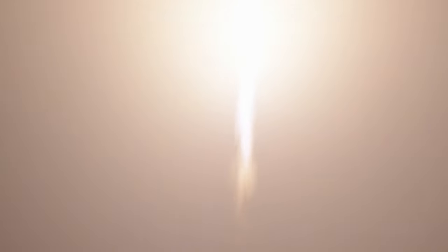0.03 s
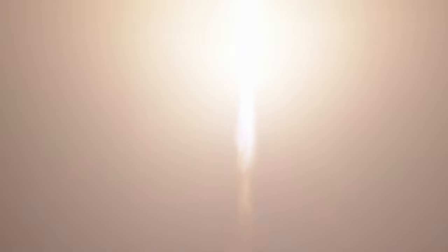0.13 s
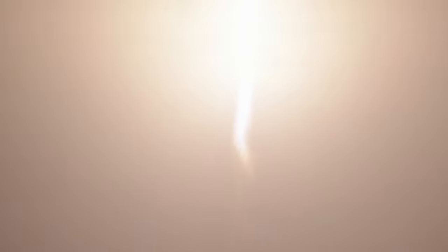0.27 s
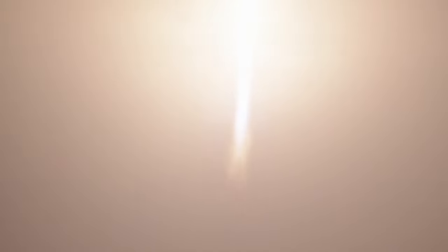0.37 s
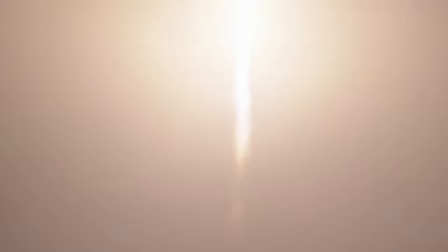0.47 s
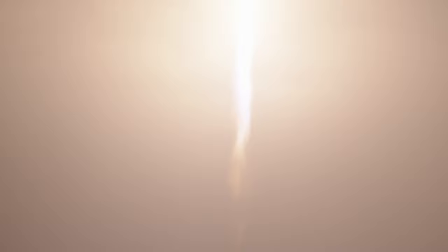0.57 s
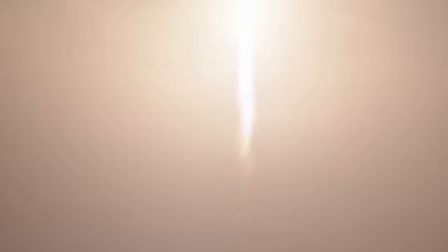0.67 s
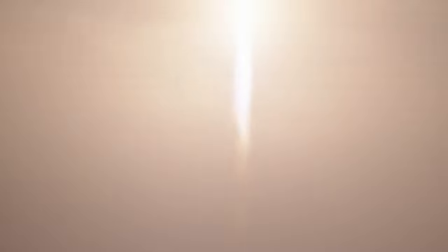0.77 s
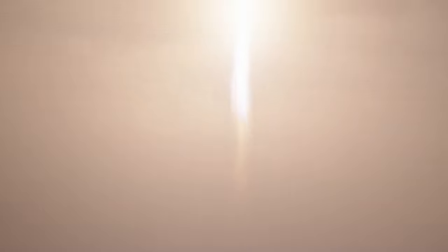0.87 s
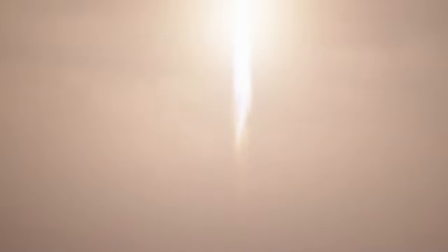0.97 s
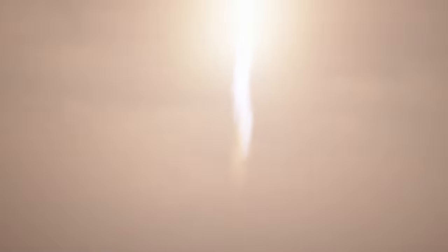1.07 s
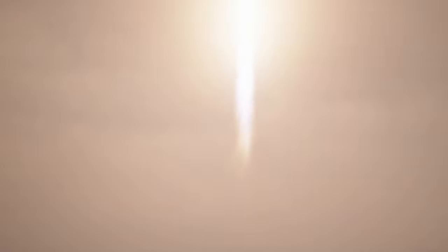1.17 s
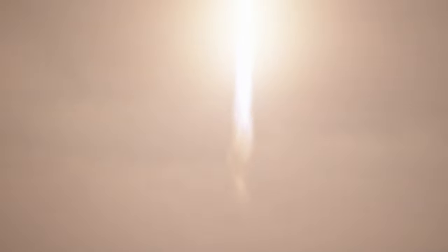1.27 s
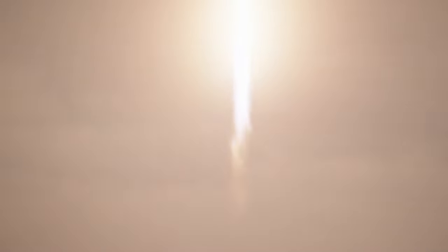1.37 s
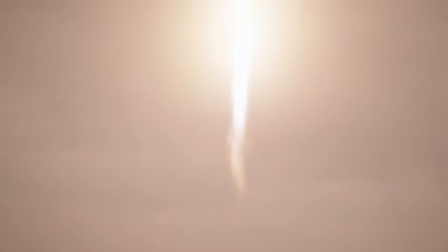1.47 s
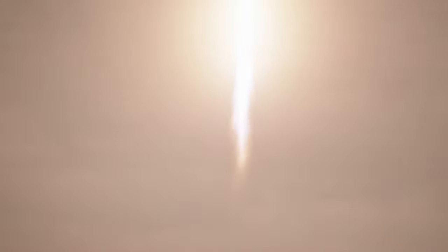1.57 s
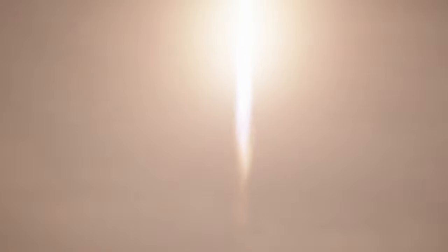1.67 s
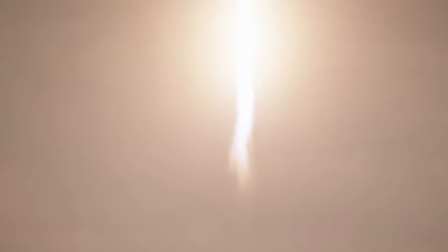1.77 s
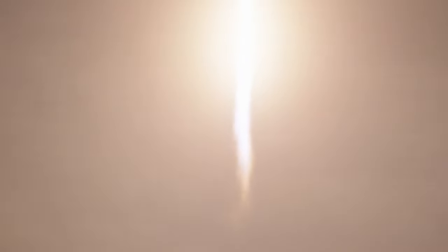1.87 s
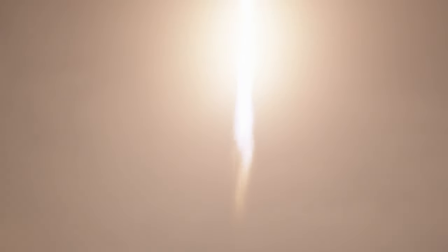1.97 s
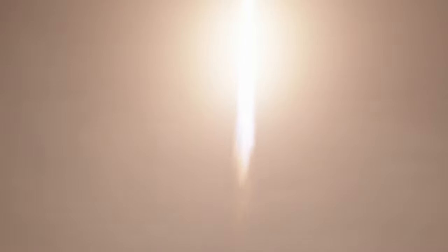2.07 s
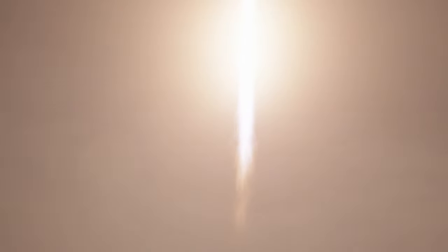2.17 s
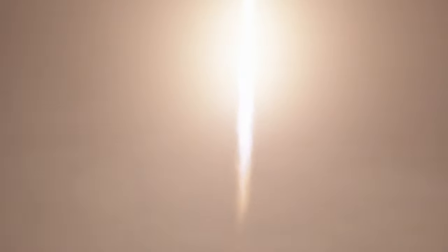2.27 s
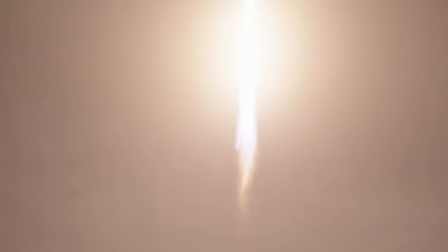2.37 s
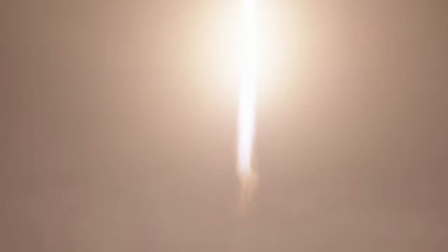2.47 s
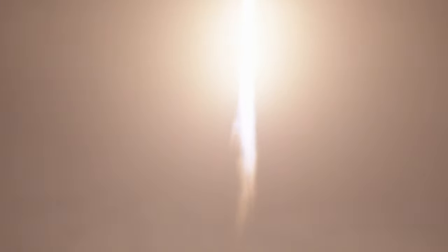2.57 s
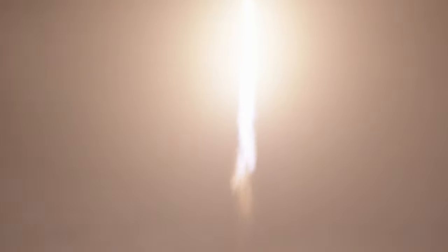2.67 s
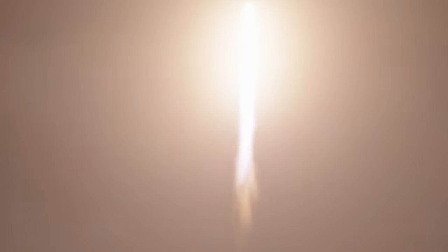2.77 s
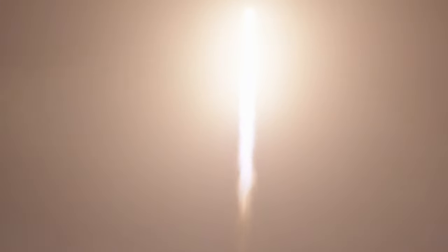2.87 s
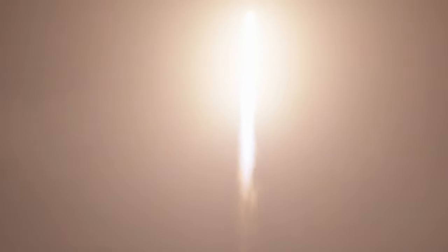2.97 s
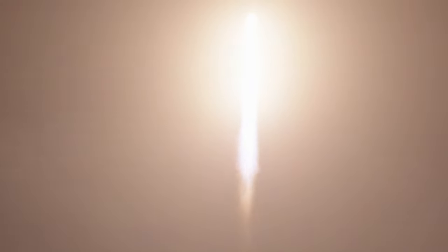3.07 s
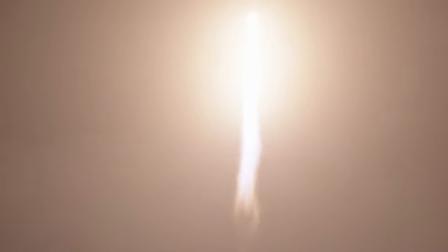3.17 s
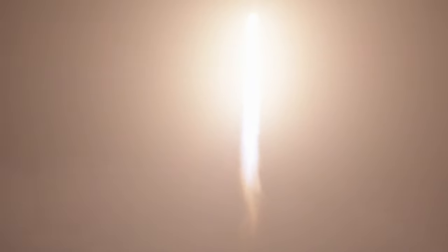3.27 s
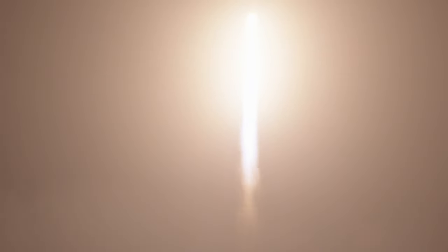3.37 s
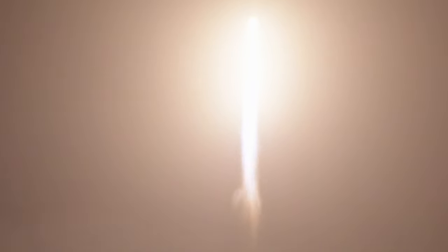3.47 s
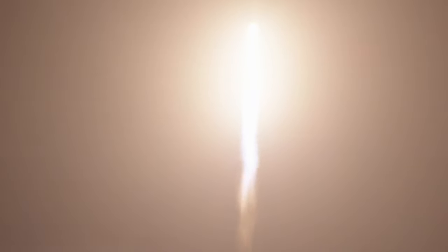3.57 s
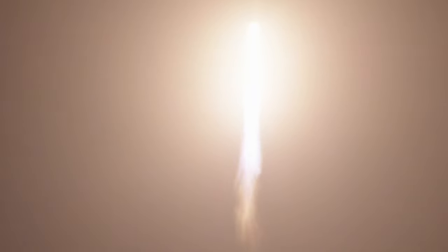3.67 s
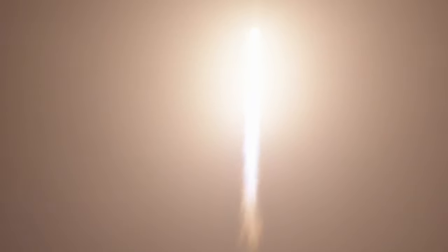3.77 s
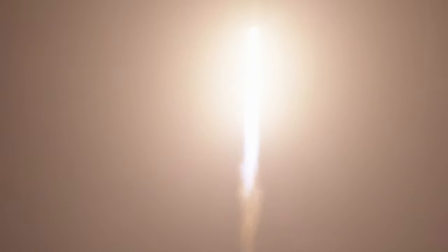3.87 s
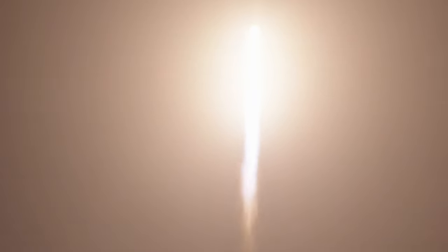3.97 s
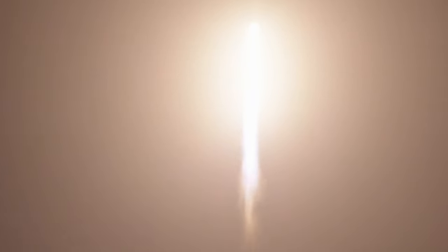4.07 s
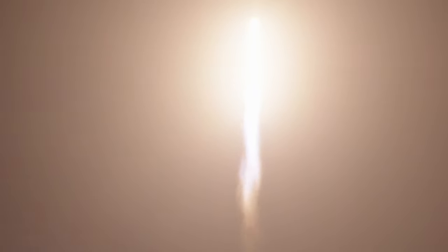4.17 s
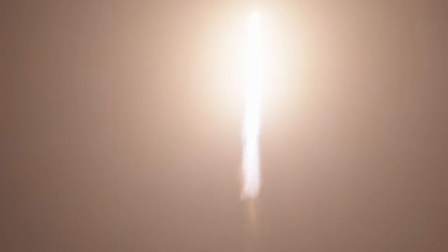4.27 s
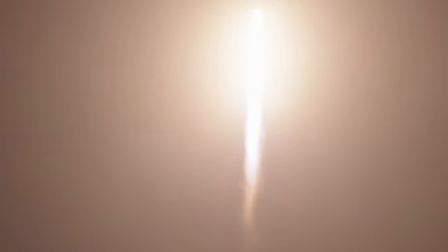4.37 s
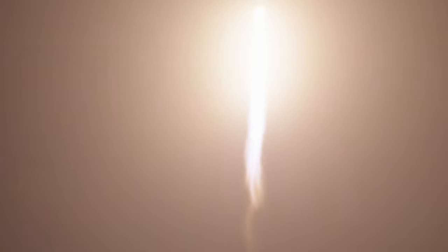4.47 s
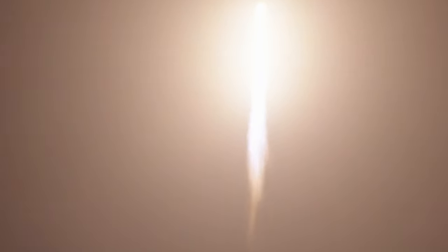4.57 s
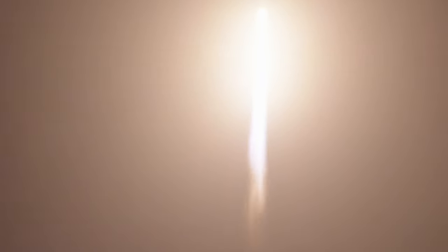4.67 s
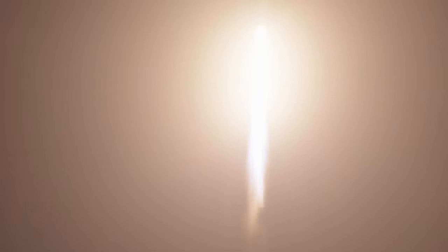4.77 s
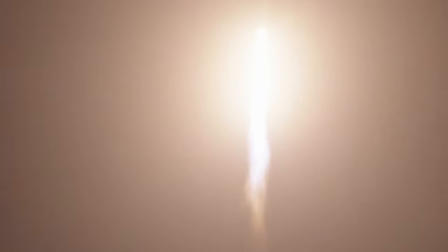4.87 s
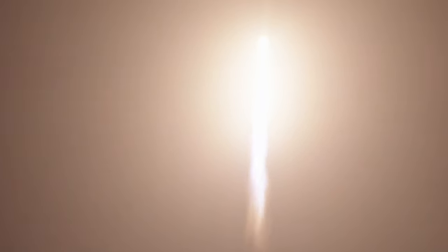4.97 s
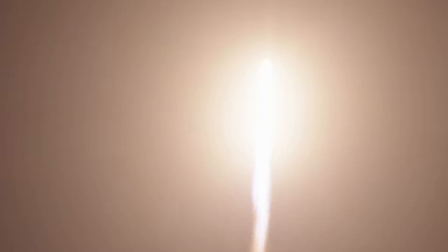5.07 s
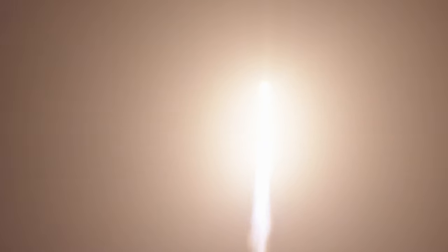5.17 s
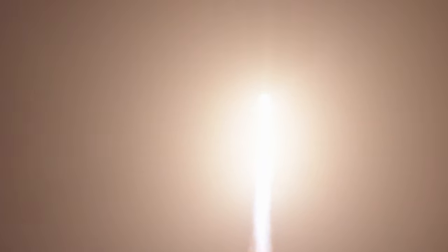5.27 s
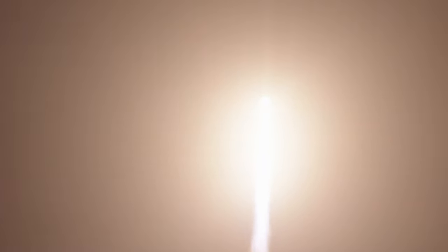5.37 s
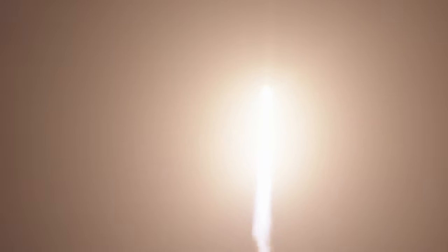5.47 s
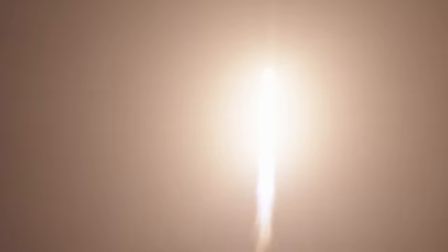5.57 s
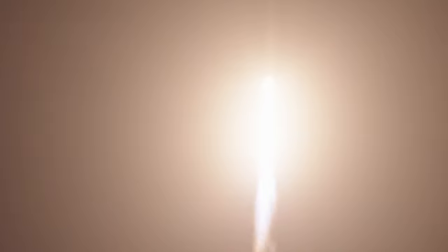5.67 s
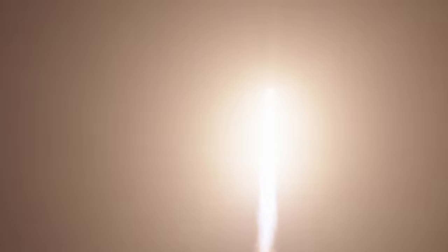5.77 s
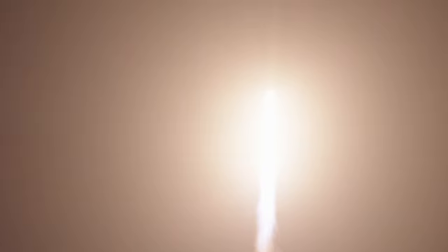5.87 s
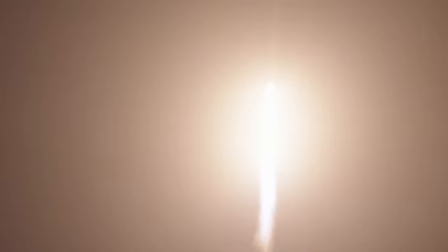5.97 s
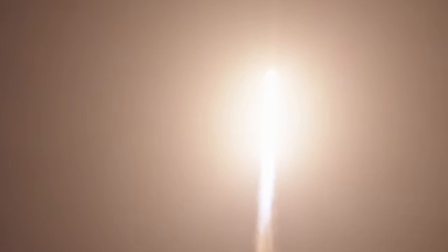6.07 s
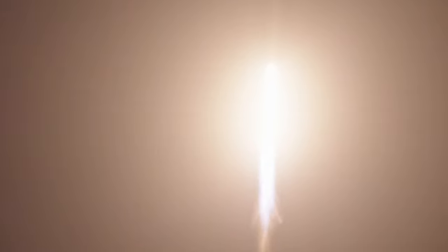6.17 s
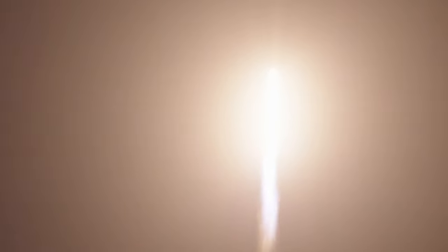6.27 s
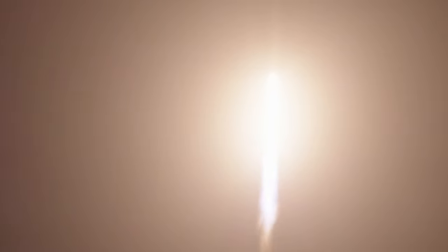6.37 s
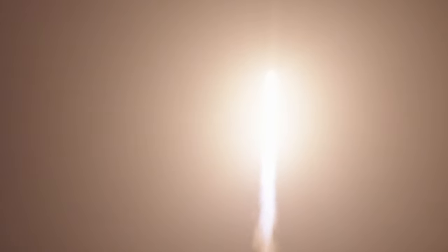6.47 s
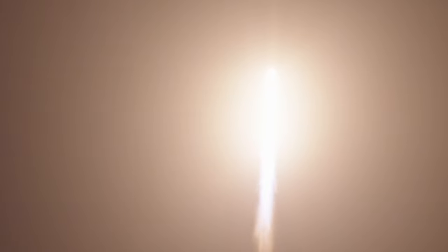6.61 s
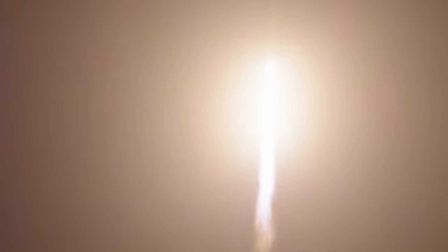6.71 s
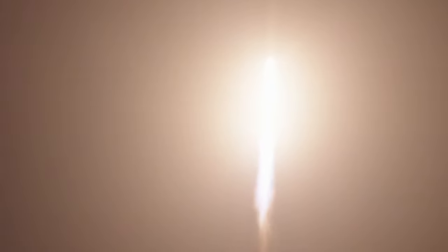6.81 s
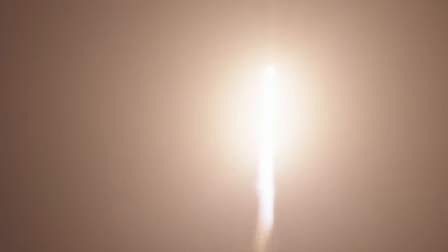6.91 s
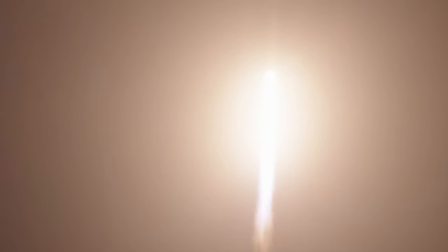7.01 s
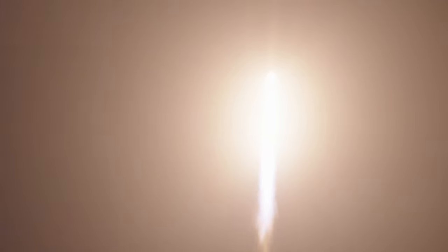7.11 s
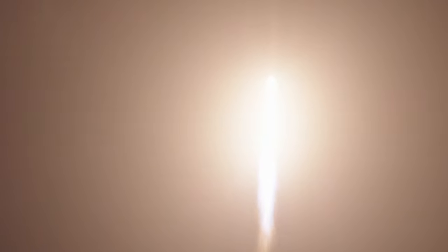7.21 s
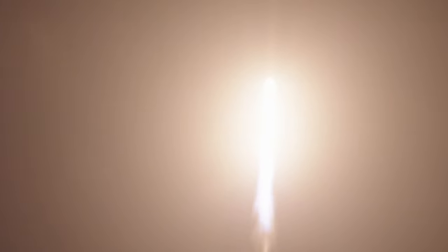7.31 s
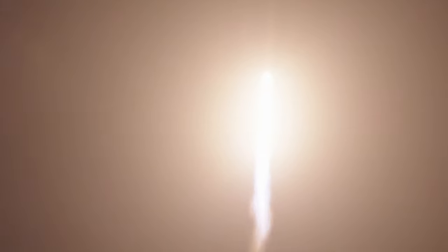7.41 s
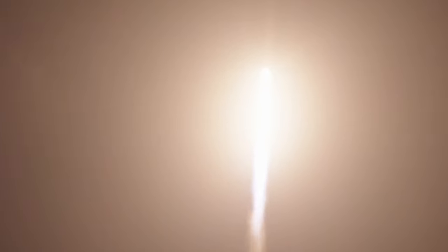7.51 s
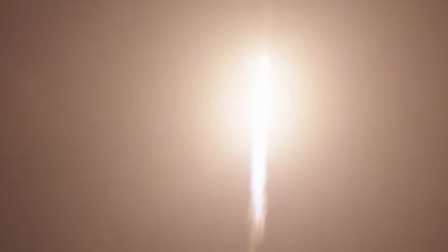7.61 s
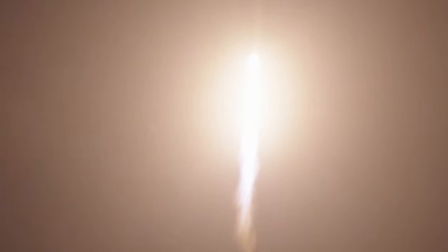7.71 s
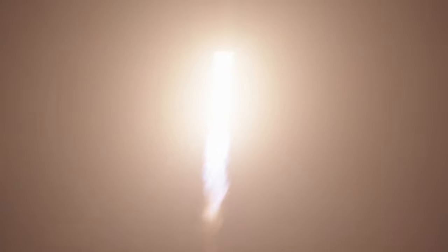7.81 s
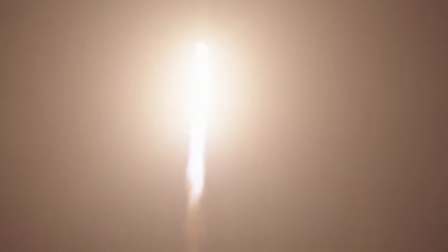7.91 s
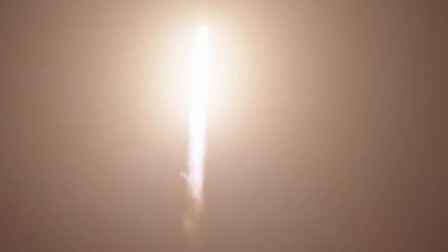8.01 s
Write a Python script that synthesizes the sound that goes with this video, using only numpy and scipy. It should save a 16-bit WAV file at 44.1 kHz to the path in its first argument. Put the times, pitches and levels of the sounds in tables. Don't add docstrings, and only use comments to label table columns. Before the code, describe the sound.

Outdoors in open ground at night, a distant rocket climbs. A quiet low rumble with soft fluttering fizz rises continuously over faint recorder hiss and a thin steady whine. Later the roar grows rough and torn, then bursts into dense, irregular sharp cracks. The small microphone distorts on the loudest crests, and the sound stops at its loudest.

```python
import sys
import numpy as np
from scipy import signal
from scipy.fft import rfft, irfft, next_fast_len
from scipy.io import wavfile

SR = 44100
rng = np.random.default_rng(int(sys.argv[2]) if len(sys.argv) > 2 else 0)


def log_audio(samples):
    frames = np.atleast_2d(samples).T
    limited = np.clip(frames, -1, 1)
    pcm = np.round(limited * 32767).astype(np.int16)
    wavfile.write(sys.argv[1], SR, pcm)


def convert_level_to_amplitude(level_db):
    exponent = np.asarray(level_db, float) / 20
    return 10 ** exponent


N = 355005
SPAN_S = np.arange(-256, 768) / SR

# t/s, gain over start/dB
POWER = [(0.0, 0), (1.0, 1.5), (2.0, 3), (3.0, 4.5), (4.0, 7), (4.8, 9), (5.4, 11.5), (6.0, 13.5),
         (6.5, 15.5), (7.0, 16), (7.5, 20), (7.8, 21), (8.05, 26)]
# f/Hz, density/dB
FIZZ_COLOUR = [(500, -35), (1000, -3.5), (1400, 3), (2300, -4), (3500, -15), (5000, -26.5), (6500, -43),
               (8000, -51)]
# t/s, crack/dB, wave/dB, rise/us
SHARP = [(6.9065, -27, -19, 30), (7.0557, -20.5, -12.5, 31), (7.102, -23.5, -16, 26),
         (7.1243, -19.5, -13.5, 42), (7.1428, -15, -9, 65), (7.1905, -21.5, -10.5, 10),
         (7.1988, -22.5, -17, 24), (7.2163, -18, -12, 20), (7.235, -19, -11.5, 10),
         (7.2584, -16.5, -10, 28), (7.2685, -16, -9.5, 23), (7.3053, -27, -16, 22), (7.3186, -18, -17, 31),
         (7.3508, -14.5, -11.5, 14), (7.4182, -20.5, -10, 13), (7.4503, -12.5, -10.5, 69),
         (7.5196, -17.5, -7, 19), (7.551, -15, -15, 15), (7.5659, -17.5, -16.5, 20),
         (7.5836, -16, -9.5, 17), (7.6115, -14, -10, 14), (7.6483, -12.5, -9.5, 20),
         (7.7274, -15.5, -13.5, 12), (7.7615, -16, -14.5, 10), (7.7734, -14, -12, 27),
         (7.8051, -13.5, -11.5, 13), (7.8372, -15, -12.5, 16), (7.8742, -16, -10, 42),
         (7.9128, -11, -6, 17), (7.9357, -16.5, -17, 25)]


def level(x, db):
    return x * convert_level_to_amplitude(db) / np.sqrt(np.mean(x ** 2))


def noise(colour):
    size = next_fast_len(N)
    hz, db = np.transpose(colour)
    bin_hz = np.arange(size // 2 + 1) * SR / size
    gain = convert_level_to_amplitude(np.interp(np.log(bin_hz + 1), np.log(hz), db, -120, -120))
    return level(irfft(rfft(rng.standard_normal(size)) * gain, size)[:N], 0)


def strike(seconds, size, shape):
    train = np.bincount(np.clip(seconds * SR, 0, N - 1).astype(int), size, N)
    faded = shape * signal.windows.tukey(len(SPAN_S), 0.3)
    zero = np.argmin(np.abs(SPAN_S))
    return signal.fftconvolve(train, faded)[zero:][:N]


def wave(length_ms=3.57, recover_ms=5.9, soft_hz=240, cut_hz=40):
    ms = SPAN_S * 1000
    ramp = (ms > 0) * (1 - 1.44 * np.minimum(ms / length_ms, 1))
    ramp = ramp * np.exp(-np.maximum(ms - length_ms, 0) / recover_ms)
    soft = signal.sosfilt(signal.butter(2, soft_hz, fs=SR, output="sos"), ramp)
    soft = signal.sosfilt(signal.butter(1, cut_hz, "high", fs=SR, output="sos"), soft)
    soft = soft * signal.windows.tukey(len(SPAN_S), 0.4)
    shift = np.argmin(np.abs(SPAN_S)) - np.argmax(soft)
    return np.roll(soft, shift) * 2 / np.ptp(soft)


def puff(decay_ms):
    ms = np.maximum(SPAN_S, 0) * 1000
    swell = 1 - np.exp(-ms / 0.25)
    return swell * np.exp(-ms / decay_ms)


def edge(u):
    return (1 + np.tanh(0.798 * (u + 0.0447 * u ** 3))) / 2


def fronts(seconds, sizes, rise_ms):
    # delay/ms, gain, extra blur/ms
    bounces = [
        (0, 0.88, 0.0064),
        (0.268, -1.61, .02),
        (0.499, 0.69, .03),
        (.78, -.12, .04),
        (1.0, 0.89, .05),
    ]
    out = np.zeros(N)
    ms = SPAN_S[192:448] * 1000
    side = 1 + 0.03 * rng.standard_normal(len(seconds))
    stretch = np.minimum(0.84 + 4 * rise_ms, 1) * side
    for s, size, rise, k in zip(seconds, sizes, rise_ms, stretch):
        front = sum(g * edge((ms - k * d) / (rise + blur)) for d, g, blur in bounces)
        front = size * front * np.exp(-np.maximum(ms, 0) / 0.56)
        i = int(s * SR) - 64
        out[i:i + len(ms)] += front[:N - i]
    return out


def follow(start_db, slope, knee_db, late_slope):
    power_db = np.interp(np.arange(N) / SR, *np.transpose(POWER))
    below_db = np.minimum(power_db, knee_db)
    above_db = np.maximum(power_db - knee_db, 0)
    return start_db + slope * below_db + late_slope * above_db


def scattered(from_s, count):
    chance = rng.random((count, 2)).T
    slot_s = (N / SR - 0.01 - from_s) / count
    return from_s + (np.arange(count) + chance[0]) * slot_s, -np.log(1 - chance[1])


def roar():
    # f/Hz, density/dB
    deep_colour = [(10, -16), (20, -4.5), (40, 2.5), (60, -2), (90, -1), (115, -5.5), (140, -26.5),
                   (200, -42)]
    rush_colour = [(130, -59), (220, -5), (300, -5.5), (400, -6), (570, -3), (800, -6), (1100, -10.5),
                   (1600, -27)]
    sizzle_colour = [(1800, -14), (3000, 11), (4500, -1.5), (6000, -8.5), (7500, -18), (9500, -21)]
    # t/s, lift/dB
    gusts = [(0.345, 4), (0.425, 6), (0.814, 7), (0.98, 6.5), (1.393, 10), (1.681, 5), (2.169, 1),
             (2.477, 6), (2.935, 10.5), (3.205, 10), (3.691, 5), (3.89, 5), (4.212, 7.5), (4.316, 3),
             (4.478, 5),
             (0.21, 3), (1.27, 4), (2.55, 5), (2.655, 6), (3.14, 5.5), (3.45, 0.5), (3.8, 6.5),
                (4.08, 4.5), (4.42, 6.5), (4.59, 6.5), (5.02, 1.5), (5.37, 5.5), (5.438, 6.5), (6.39, -6)]
    count, gust_s = 1100, 0.016

    chance = rng.random((count, 3)).T
    seconds = (np.arange(count) + 1.46 * chance[0]) * N / SR / count
    size = convert_level_to_amplitude(np.minimum(-2.5 * np.log(1 - chance[1]), 7))
    pulse = wave(length_ms=3.87, recover_ms=5.2, soft_hz=202.6, cut_hz=27.4)
    train = level(strike(seconds, size, pulse), 0)
    flare = strike(seconds + 0.0025 * chance[2], size ** 2, puff(decay_ms=20.0))
    flare = flare / np.mean(flare)

    rush = level((1.7 + flare) * noise(rush_colour), 0)
    fizz = level((0.43 + flare) * noise(FIZZ_COLOUR), 0)
    sizzle = level((0.5 + flare) * noise(sizzle_colour), 0)
    t = np.arange(N) / SR
    gust_db = sum(db * np.exp(-((t - s) / gust_s) ** 2 / 2) for s, db in gusts)

    deep_db = follow(start_db=-44.5, slope=1.0663, knee_db=17.5, late_slope=0.47)
    train_db = follow(start_db=-44, slope=0.95, knee_db=13, late_slope=0.2569)
    rush_db = follow(start_db=-60.5, slope=1.0128, knee_db=14.5, late_slope=0.54) + 0.41 * gust_db
    fizz_db = follow(start_db=-71.5, slope=1.1832, knee_db=10.5, late_slope=0.64) + gust_db
    sizzle_db = follow(start_db=-116, slope=3.5, knee_db=13, late_slope=1.3)
    low = convert_level_to_amplitude(deep_db) * noise(deep_colour) + convert_level_to_amplitude(train_db) * train
    return low + convert_level_to_amplitude(rush_db) * rush + convert_level_to_amplitude(fizz_db) * fizz + convert_level_to_amplitude(sizzle_db) * sizzle


def electronics():
    # multiple, level/dB
    whine_partials = [(1, -77), (2, -78.5), (3, -80.5), (4, -83.5), (5, -86.5), (6, -88.5), (7, -94),
                      (8, -96.5), (9, -100)]
    # f/Hz, level/dB
    stray_tones = [(2666.4, -86), (12828, -100)]
    # f/Hz, density/dB
    hiss_colour = [(1500, 4), (3000, -7), (5000, -5), (8000, -8), (11000, -6), (15000, -1), (15680, -5),
                   (15800, -40)]
    whine_hz, wobble_hz = 998.4, 124.8
    turn = 2 * np.pi * np.arange(N) / SR
    phase = whine_hz * turn + 0.2 * np.sin(wobble_hz * turn)
    whine = sum(convert_level_to_amplitude(db) * np.sin(k * phase) for k, db in whine_partials)
    stray = sum(convert_level_to_amplitude(db) * np.sin(hz * turn) for hz, db in stray_tones)
    hiss = convert_level_to_amplitude(-74.5) * noise(hiss_colour)
    return np.sqrt(2) * (whine + stray) + hiss


def torn():
    # t/s, fizz/dB, wave/dB
    torn_waves = [(5.5168, -40, -25), (5.634, -38.5, -25), (5.6701, -33, -23.5), (5.805, -34.5, -27),
                  (5.8396, -32, -22), (5.9283, -30, -33), (5.9718, -30.5, -21), (6.0117, -34, -21.5),
                  (6.0457, -31.5, -24), (6.13, -30.5, -26), (6.1587, -34, -21), (6.2131, -28, -20.5),
                  (6.2421, -31, -21), (6.3265, -30, -19), (6.3347, -29, -20), (6.4034, -46, -26),
                  (6.427, -36.5, -21), (6.4469, -42, -24), (6.4673, -29.5, -19), (6.4968, -32, -21),
                  (6.5375, -27, -19.5), (6.5656, -26.5, -17), (6.6078, -27.5, -17), (6.6363, -22, -16.5),
                  (6.6765, -25, -14.5), (6.7221, -27.5, -25.5), (6.7411, -25.5, -15.5), (6.7637, -29, -17),
                  (6.7834, -27.5, -22), (6.8223, -26.5, -17)]
    seconds, fizz_db, wave_db = np.transpose(torn_waves)
    waves = strike(seconds, convert_level_to_amplitude(wave_db), wave())
    minor_s, chance = scattered(from_s=5.3, count=150)
    power_db = np.minimum(np.interp(minor_s, *np.transpose(POWER)), 20)
    minor_db = -61 + 1.02 * power_db + 4 * np.minimum(chance, 2)
    seconds, fizz_db = np.append(seconds, minor_s), np.append(fizz_db, minor_db)
    burst_shape = puff(decay_ms=1.38) + 0.26 * puff(decay_ms=6.0)
    burst = strike(seconds - 0.0004, convert_level_to_amplitude(fizz_db - 5.5), burst_shape)
    snap = fronts(seconds, convert_level_to_amplitude(fizz_db + 2.5), rise_ms=np.full(len(seconds), 0.05))
    return waves + burst * noise(FIZZ_COLOUR) + snap


def shocks():
    # t/s, crack/dB, wave/dB
    blunt_shocks = [(6.86, -28, -15), (6.882, -23.5, -20.5), (6.9127, -22.5, -15.5), (6.9393, -28, -14.5),
                    (6.9555, -25.5, -18), (6.971, -33, -16), (6.9907, -21, -12.5), (7.0269, -22.5, -16.5),
                    (7.077, -19.5, -14.5), (7.0871, -25, -22), (7.7878, -15, -15.5), (7.1615, -23.5, -24),
                    (7.2947, -22, -18), (7.3247, -20, -12), (7.368, -22, -16), (7.3942, -19.5, -15.5),
                    (7.949, -27.5, -15), (7.4833, -33, -14), (7.4976, -19.5, -22), (7.5717, -19, -17),
                    (7.6186, -17, -15), (7.654, -23, -20), (7.6875, -21, -9), (7.752, -21, -22),
                    (7.8566, -13.5, -4), (7.899, -24, -11.5), (7.964, -24, -14), (7.977, -24, -20),
                    (8.006, -16.5, -7), (8.0273, -23, -14)]
    # f/Hz, density/dB
    tail_colour = [(300, -15), (700, 29), (2000, 10), (3500, 8), (5500, -12), (7500, -19), (12000, -23),
                   (16000, -40)]
    blunt = [(s, crack, body, 46 + 2 * max(body + 13, 0)) for s, crack, body in blunt_shocks]
    seconds, crack_db, wave_db, rise_us = np.transpose(SHARP + blunt)
    lead_s = 0.0006 + 0.0005 * np.clip((crack_db + 20) / 9, 0, 1)
    waves = strike(seconds + lead_s, convert_level_to_amplitude(wave_db), wave())
    whole = np.clip((crack_db + 33) / 16, 0.1, 1)
    tear = strike(seconds, (1 - whole) * convert_level_to_amplitude(crack_db + 4.5), puff(decay_ms=0.68)) * noise(FIZZ_COLOUR)
    tail = strike(seconds, convert_level_to_amplitude(0.53 * crack_db - 20.5), puff(decay_ms=3.2)) * noise(tail_colour)
    rise_ms = np.clip(rise_us, 6, 85) / 1000
    return waves + tear + tail + fronts(seconds, whole * convert_level_to_amplitude(crack_db + 10.5), rise_ms)


def haze():
    # f/Hz, density/dB
    haze_colour = [(1500, -23), (2800, 0), (4500, 1.5), (6500, -8.5), (7800, -7.5), (9000, -22)]
    decay_s = 0.083
    seconds, crack_db, _, rise_us = np.transpose(SHARP)
    treble = convert_level_to_amplitude(crack_db + 8.5) * 20 / np.maximum(rise_us, 15)
    power = np.bincount((seconds * SR).astype(int), treble, N)
    power = signal.lfilter([1], [1, -np.exp(-1 / (decay_s * SR))], power)
    return convert_level_to_amplitude(-61.5) * np.sqrt(power) * noise(haze_colour)


def ticks():
    # t/s, level/dB
    clear_ticks = [(7.2863, -52), (7.328, -42), (7.3387, -47), (7.4289, -38), (7.545, -46), (7.6812, -39),
                   (7.7098, -43), (7.7183, -44), (7.7459, -47), (7.797, -43), (7.832, -34), (7.9565, -43),
                   (7.982, -36), (7.992, -38), (8.042, -36.5)]
    # f/Hz, density/dB
    tick_colour = [(2000, -16), (3800, 5.5), (5500, 3), (7500, -7), (11000, -21), (16000, -30)]
    from_s, growth_db_per_s, spread_db = 7.14, 5, 3.5
    seconds, chance = scattered(from_s, count=70)
    db = -59 + growth_db_per_s * (seconds - from_s) + spread_db * np.minimum(chance, 3)
    clear_s, clear_db = np.transpose(clear_ticks)
    seconds, db = np.append(seconds, clear_s), np.append(db, clear_db)
    return strike(seconds, convert_level_to_amplitude(db), puff(decay_ms=2.4)) * noise(tick_colour)


def scene():
    return (roar() + torn() + shocks() + haze() + ticks())[None]


def top_cut(x):
    return signal.sosfilt(signal.butter(12, 16970, fs=SR, output="sos"), x)


def record(dry):
    ceiling, ring_hz, ring_q, ring_gain, top_hz = 0.515, 12700, 6.0, 0.9, 16100
    steady = signal.lfilter(*signal.butter(1, 6, "high", fs=SR), dry)
    flat = np.clip(steady, -ceiling, ceiling)
    ringing = flat + ring_gain * signal.lfilter(*signal.iirpeak(ring_hz, ring_q, SR), flat)
    cut = signal.ellip(6, 0.1, 45, top_hz, fs=SR, output="sos")
    mix = signal.sosfiltfilt(cut, ringing) + electronics()
    return top_cut(mix)


dry = scene()
out = record(dry)
log_audio(out)
```